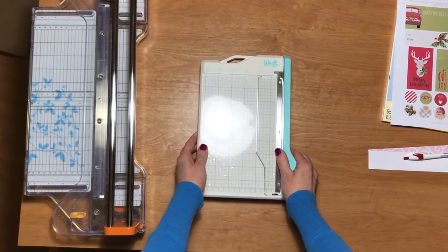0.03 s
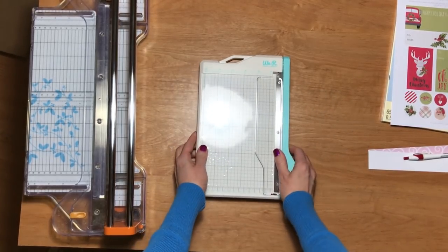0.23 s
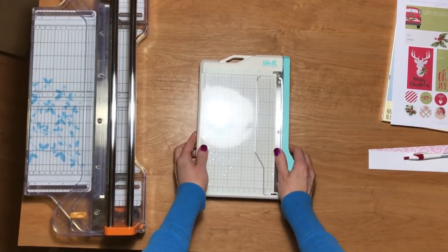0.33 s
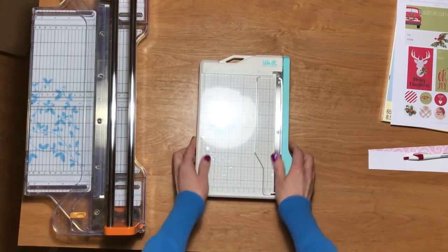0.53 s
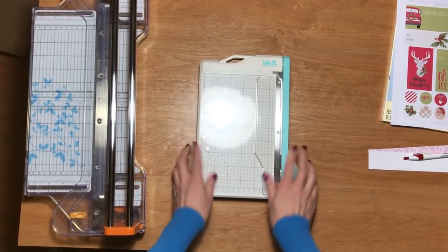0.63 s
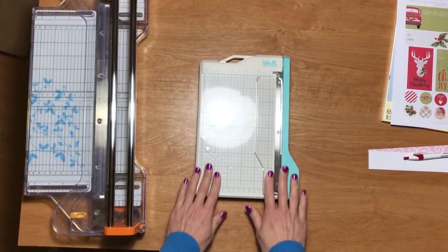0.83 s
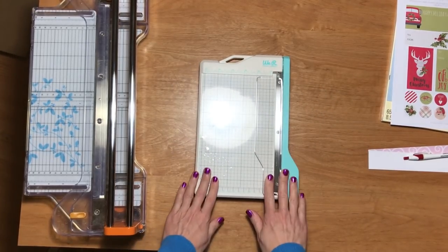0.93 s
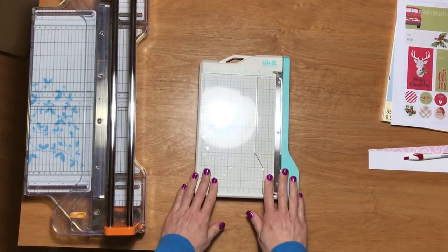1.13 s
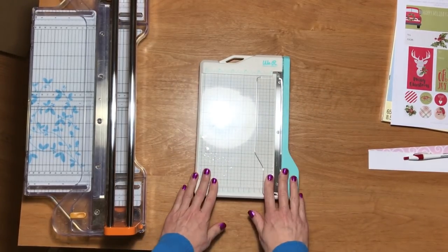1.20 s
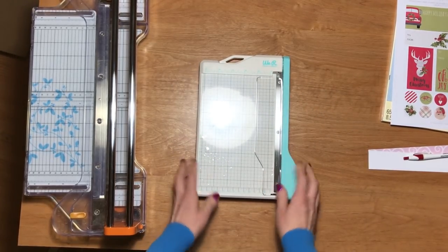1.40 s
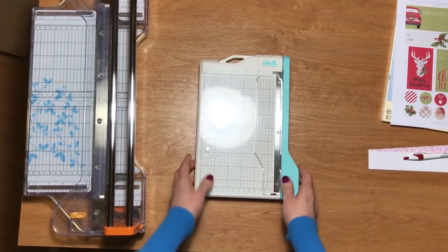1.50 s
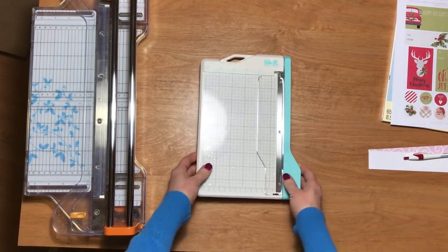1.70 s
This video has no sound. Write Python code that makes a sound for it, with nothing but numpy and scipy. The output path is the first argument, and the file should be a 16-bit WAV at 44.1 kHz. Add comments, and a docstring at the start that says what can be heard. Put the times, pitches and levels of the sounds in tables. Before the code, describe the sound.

A plastic paper cutter lands on a wooden table with a rattling clack and then a firm flat knock; softer knock and light fingernail ticks follow. Close, nearly mono, in a small quiet room.

```python
"""Plastic paper cutter set down on a wooden table.

In a quiet room the cutter lands on an edge, knocks down flat and later rocks under the hands.
Knocks ring low modes of table and room and those of the base plate, with a noise burst for clatter;
two of them come with a low boom. Clacks add a crack and the detuned modes of the blade arm.
Fingernail ticks are short damped tones; fingers and plastic slide as shaped, grainy noise.
A small room adds reflections and a tail; the sound is close and nearly mono."""
import sys
import numpy as np
from scipy import signal
from scipy.fft import irfft
from scipy.io import wavfile
from scipy.ndimage import uniform_filter1d

SR = 44100
rng = np.random.default_rng(int(sys.argv[2]) if len(sys.argv) > 2 else 0)


def digitize_waveform(pressure):
    """Quantize a signal to 16-bit integers and store it at the path in sys.argv[1].

    Rows of a 2-D input are taken as channels; values are limited to [-1, 1].
    """
    field = np.atleast_2d(pressure).T
    bounded = np.clip(field, -1, 1)
    quanta = np.round(bounded * 32767).astype(np.int16)
    wavfile.write(sys.argv[1], SR, quanta)


N = 77175
T = np.arange(round(0.6 * SR)) / SR  # time axis of one struck sound, s


def amp(db):
    """Decibels to gain."""
    return 10 ** (np.asarray(db) / 20)


def unit(x):
    """Scales to an rms of one."""
    return x / np.sqrt(np.mean(x ** 2) + 1e-20)


def read(points, hz):
    """Interpolates a table on a log-frequency axis."""
    f, value = np.transpose(points)
    return np.interp(np.log(hz + 1), np.log(f + 1), value)


def add(mix, start_s, sound):
    """Mixes a sound in at a time, cut at the end of the mix."""
    part = mix[max(round(start_s * SR), 0):][:len(sound)]
    part += sound[:len(part)]


def noise(spectrum, size):
    """Noise of unit rms with a given spectrum and random phases."""
    hz = np.fft.rfftfreq(size, 1 / SR)
    phases = np.exp(2j * np.pi * rng.random(len(hz)))
    return unit(irfft(amp(read(spectrum, hz)) * phases, size))


def dying(t60_s):
    """Exponential decay, 60 dB down after t60_s."""
    return np.exp(-np.log(1000) * T / t60_s)


def rising(rise_s):
    """Exponential approach to one."""
    return 1 - np.exp(-T / rise_s)


def ring(modes):
    """Decaying modes, each given as Hz, dB, t60 in seconds."""
    return sum(amp(db) * dying(t60_s) * np.sin(2 * np.pi * hz * T) for hz, db, t60_s in modes)


def soften(x, hz, order=2):
    """Low-pass: a softer contact leaves out the treble."""
    return signal.lfilter(*signal.butter(order, min(hz, SR / 2 - 2000), fs=SR), x)


def low_cut(x, hz):
    """Second-order high-pass."""
    return signal.lfilter(*signal.butter(2, hz, "highpass", fs=SR), x)


def burst(spectrum, t60_s, size=4096):
    """Many overlapping modes that start and die together, as enveloped noise."""
    envelope = dying(t60_s) * rising(0.00044)
    return np.pad(noise(spectrum, size), (0, len(T) - size)) * envelope


# Background spectrum. Each row: frequency in Hz, relative density in dB per Hz.
AIR_SPECTRUM = [(20, -35), (35, 4.5), (50, 14), (75, -3.5), (120, -2.5), (200, -4), (270, -1.5),
                (400, -7.5), (600, -10.5), (1000, -12.5), (2000, -18.5), (4000, -21), (8300, -25.5),
                (9200, -25), (9900, -43.5), (14000, -43)]
AIR_RMS_DB = -65


def air():
    """The quiet room's steady background noise."""
    return amp(AIR_RMS_DB) * noise(AIR_SPECTRUM, N)


# Sliding skin. Each row: frequency in Hz, relative density in dB per Hz.
RUB_SPECTRUM = [(60, 2.5), (200, 3.5), (500, 1.5), (1100, 0), (2000, -7), (3100, -10.5), (4200, -14),
                (8000, -15), (10500, -52)]
# Narrow hiss of plastic dragged over wood. Each row: frequency in Hz, relative density in dB per Hz.
DRAG_SPECTRUM = [(100, -40), (2200, -13.5), (3100, -4), (4300, -18), (10500, -61)]
# Slides of fingers and cutter. Each row: start in s, length in s, rub level in dB, drag hiss level in dB.
SLIDES = [(-0.03, 0.32, -65.5, -67.5), (0.309, .14, -63.5, -68.5), (0.59, 0.15, -71, -81),
          (1.044, 0.038, -73, -85), (1.636, 0.066, -64.5, -78)]
SLIDE_FADE_S, SLIDE_GRAIN_DB = 0.0037, 1


def slides():
    """Friction of skin and plastic: two noises under a random grain in level."""
    t = np.arange(N) / SR
    rub, drag = noise(RUB_SPECTRUM, N), noise(DRAG_SPECTRUM, N)
    out = np.zeros(N)
    for start_s, length_s, rub_db, drag_db in SLIDES:
        to_nearest_end_s = np.minimum(t - start_s, start_s + length_s - t)
        fade = np.clip(to_nearest_end_s / SLIDE_FADE_S, 0, 1)
        out += fade * (amp(rub_db) * rub + amp(drag_db) * drag)
    wander = unit(uniform_filter1d(rng.standard_normal(N), size=200))
    return out * unit(amp(SLIDE_GRAIN_DB * wander))


# Hard clacks of blade arm and loose parts. Each row: start in s, level in dB, contact brightness in Hz.
CLACKS = [(0.159, -49, 3400), (0.2254, -28.5, 5800), (0.2294, -28, 13000), (0.2335, -30.5, 7140),
          (0.2376, -29, 6000), (0.2412, -31, 6400), (0.2447, -35, 5600), (0.356, -53.5, 6000),
          (0.4288, -29, 5010), (1.13, -48, 2350), (1.176, -58, 2380), (1.668, -53, 3360),
          (1.682, -62, 3720), (1.693, -61, 2500)]
# Blade arm modes. Each row: frequency in Hz, relative level in dB, t60 in s.
ARM_MODES = [(1000, -13.5, 0.071), (1742, -13.5, 0.11), (2000, -14, 0.1), (2200, -1.5, 0.054),
             (2360, -10, 0.11), (3360, -15.5, 0.08), (4080, -15, 0.1), (4670, -5.5, 0.041),
             (5820, -23, 0.06), (6360, -16, 0.079)]
# Crack of colliding parts. Each row: frequency in Hz, relative density in dB per Hz.
CRACK_SPECTRUM = [(100, -24), (350, -17), (600, -15.5), (1300, -14), (1800, -5), (2200, 1), (2900, -5),
                  (4500, -3.5), (6500, -2.5), (7300, -11), (8500, -4.5), (9600, -10.5), (10500, -29),
                  (12500, -8), (14000, -31.5)]
ARM_DB, CRACK_DB, CRACK_T60_S = -7.5, -3, 0.036
ARM_DETUNE = 0.004  # fraction of the mode frequency


def clacks():
    """Hard parts collide: a short crack, and arm modes with new signs and slight detuning each time."""
    out = np.zeros(N)
    for start_s, level_db, bright_hz in CLACKS:
        signs = rng.choice([-1., 1.], len(ARM_MODES))
        shifts = 1 + ARM_DETUNE * rng.uniform(-1.28, 1, len(ARM_MODES))
        arm = np.zeros(len(T))
        for sign, shift, (hz, db, t60_s) in zip(signs, shifts, ARM_MODES):
            arm += sign * ring([(hz * shift, db, t60_s)])
        crack = burst(CRACK_SPECTRUM, CRACK_T60_S)
        clack = soften(amp(ARM_DB) * arm + amp(CRACK_DB) * crack, bright_hz)
        clack = soften(clack, 2 * bright_hz, order=8)  # steep cut an octave above
        add(out, start_s, amp(level_db) * clack)
    return out


# Parts of the cutter that land, in the order of the mode tables' level columns.
PARTS = ("edge", "face", "corner")


def struck(modes, rise_s):
    """The ring for each part that lands: same modes, excited in different proportions."""
    rings = {}
    for k, part in enumerate(PARTS):
        part_modes = [(hz, levels_db[k], t60_s) for hz, t60_s, *levels_db in modes]
        rings[part] = rising(rise_s) * ring(part_modes)
    return rings


# Knocks of the cutter. Each row: start in s, part that lands, low body level in dB,
# base plate level in dB, plastic clatter level in dB, contact brightness in Hz.
KNOCKS = [(0.2169, "edge", -25.5, -34, -37.5, 523), (0.228, "edge", -46, -33.5, -45, 1820),
          (0.2424, "edge", -42.5, -42, -55, 705), (0.4255, "face", -29, -18.5, -38.5, 900),
          (0.4298, "face", -31.5, -37.5, -34, 1177), (0.600, "face", -59.5, -50, -60, 800),
          (0.6085, "face", -47.5, -70, -62, 325), (1.056, "corner", -59, -64, -60, 2220),
          (1.064, "corner", -60.5, -60.5, -59.5, 2060), (1.13, "corner", -60, -48, -39, 2210),
          (1.1323, "corner", -34.5, -30.5, -38, 1670), (1.643, "corner", -70.5, -72, -61.5, 890),
          (1.657, "corner", -57, -50.5, -61.5, 910)]
# Low modes of table and room together.
# Each row: frequency in Hz, t60 in s, relative level in dB for edge, face, corner.
BODY_MODES = [(123.6, 0.2, -13, -34, -44), (145.9, 0.47, -20, -14.5, -15), (179.8, 0.18, -6, -4.5, -11.5),
              (211.4, 0.3, -14, -7, -7), (237.3, 0.06, 2.5, 2, 1), (247.5, 0.2, -10, -16.5, -6.5),
              (311.6, 0.082, -10, -12.5, -7.5)]
# Base plate modes. Each row: frequency in Hz, t60 in s, relative level in dB for edge, face, corner.
PLATE_MODES = [(436, 0.16, -17.5, -26, -14.5), (487, 0.066, -15, -12.5, -10), (577, 0.075, -23, -7, -14.5),
               (671.6, 0.14, -27, -11, -31), (712, 0.087, -9, -15.5, -7.5), (745.7, 0.1, -25, -11, -9.5),
               (827, 0.17, -23, -19.5, -17), (995.5, 0.056, -6.5, -20, -13), (1365, 0.13, -32, -23, -18),
               (1491, 0.093, -11, -20.5, -15), (1551, 0.15, -17.5, -21, -17.5)]
# Dense modes of the plastic. Each row: frequency in Hz, relative density in dB per Hz.
CLATTER_SPECTRUM = [(50, -41), (110, -16), (200, -8), (350, 1), (520, -1.5), (900, 1), (1300, -4),
                    (2200, -0.5), (3500, -9.5), (6500, -7.5), (8000, -24.5), (12000, -56)]
BODY_RISE_S, PLATE_RISE_S, CLATTER_T60_S, KNOCK_LOW_HZ = 0.0012, 0.00037, 0.073, 94


def knocks():
    """Low modes of table and room are the body of each knock; the base plate rings, the plastic clatters."""
    out = np.zeros(N)
    body = struck(BODY_MODES, BODY_RISE_S)
    plate = struck(PLATE_MODES, PLATE_RISE_S)
    for start_s, part, body_db, plate_db, clatter_db, bright_hz in KNOCKS:
        clatter = burst(CLATTER_SPECTRUM, CLATTER_T60_S)
        knock = amp(body_db) * body[part] + amp(plate_db) * plate[part] + amp(clatter_db) * clatter
        add(out, start_s, soften(knock, bright_hz))
    # removes the low thud that the abrupt onsets of the synthesis would add
    return low_cut(out, KNOCK_LOW_HZ)


# Low booms. Each row: start in s, level in dB.
BOOMS = [(0.235, -38.5), (0.44, -44.5)]
# Two close modes that beat. Each row: frequency in Hz, relative level in dB, t60 in s.
BOOM_MODES = [(60.1, -4, 0.35), (69.6, -2, .3)]
BOOM_RISE_S = 0.0068


def booms():
    """A low boom of table and room: two close modes that beat, with a slow rise."""
    out = np.zeros(N)
    boom = ring(BOOM_MODES) * rising(BOOM_RISE_S)
    for start_s, level_db in BOOMS:
        add(out, start_s, amp(level_db) * boom)
    return out


# Reverberation time. Each row: frequency in Hz, t60 in s.
ROOM_T60 = [(70, 0.17), (200, 0.73), (700, 0.4664), (2000, 0.3459), (5000, 0.22), (10000, 0.37)]
# Colour of the tail. Each row: frequency in Hz, relative level in dB.
ROOM_COLOUR = [(60, -3), (130, -1.5), (220, -6), (400, 0.5), (700, -6.5), (1300, 6.5), (2100, 1),
               (3100, 3.5), (5000, 4), (9000, 1), (11500, -18)]
# Reflections from nearby surfaces. Each row: delay in s, level in dB.
ECHOES = [(.0095, -18.5), (.029, -17.5), (0.0488, -19.5)]
ROOM_DB, ROOM_DELAY_S, ECHO_HZ = -12, 0.011, 1860


def room(x):
    """A small room: a few dull reflections and a diffuse tail, each band dying at its own speed."""
    hz, t, bands = signal.stft(noise(ROOM_COLOUR, len(T)), SR, nperseg=256)
    bands = bands * np.exp(-np.log(1000) * t / read(ROOM_T60, hz)[:, None])
    tail = signal.istft(bands, SR)[1]
    tail = tail / np.linalg.norm(tail)
    out = np.zeros(N)
    add(out, ROOM_DELAY_S, amp(ROOM_DB) * signal.fftconvolve(x, tail))
    reflected = soften(x, ECHO_HZ)
    for delay_s, level_db in ECHOES:
        add(out, delay_s, amp(level_db) * reflected)
    return out


# Fingernails and plastic edges. Each row: start in s, level in dB, pitch in Hz.
TICKS = [(0.4298, -38, 2160), (1.1307, -51.5, 3100), (1.314, -64.5, 4360), (1.452, -48, 2420),
         (1.4958, -51, 2850), (1.669, -53.5, 2070), (1.6925, -45.5, 2150), (1.6937, -55, 3170),
         (1.712, -60, 3270), (1.7445, -55.5, 2700)]
TICK_RISE_S = 0.00078
TICK_SPREAD, TICK_UPPER, TICK_CLICK = 0.17, 0.32, 0.097  # upper tone's offset ratio and gain, noise gain


def ticks(size=1024):
    """A light tick is a few milliseconds of heavily damped ringing: two tones and a little noise."""
    out, t = np.zeros(N), T[:size]
    u = t / TICK_RISE_S
    envelope = u * np.exp(1 - u)  # peaks at one after TICK_RISE_S
    for start_s, level_db, hz in TICKS:
        lower = np.sin(2 * np.pi * hz * t)
        upper = np.sin(2 * np.pi * hz * (1 + TICK_SPREAD) * t)
        click = noise(CLATTER_SPECTRUM, size)
        tick = envelope * (lower + TICK_UPPER * upper + TICK_CLICK * click)
        add(out, start_s, amp(level_db) * tick)
    return out


SIDE_DB, SIDE_LOW_HZ = -25, 3900


def scene():
    """The cutter in the room; the two channels differ only a little, in the treble."""
    cutter = knocks() + booms() + clacks()
    mid = cutter + room(cutter) + ticks() + slides() + air()
    band = signal.butter(2, [SIDE_LOW_HZ, SIDE_LOW_HZ * 1.52], "bandpass", fs=SR)
    quadrature = signal.hilbert(mid).imag  # mid shifted by 90 degrees
    side = amp(SIDE_DB) * signal.lfilter(*band, quadrature)
    return np.array([mid + side, mid - side])


LOW_CUT_HZ, EDGE_HZ = 31, 13700


def record(dry):
    """The recorder's rumble filter and band limit."""
    band_limit = signal.firwin(511, EDGE_HZ, window=("kaiser", 9), fs=SR)
    return signal.oaconvolve(low_cut(dry, LOW_CUT_HZ), band_limit[None], "same")


dry = scene()
out = record(dry)
digitize_waveform(out)
```